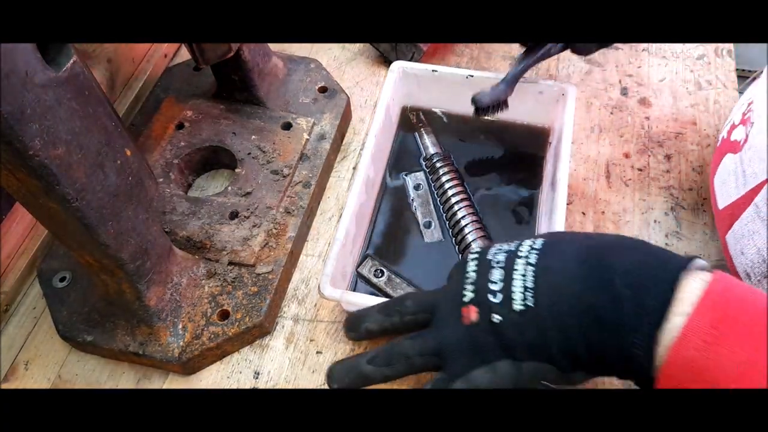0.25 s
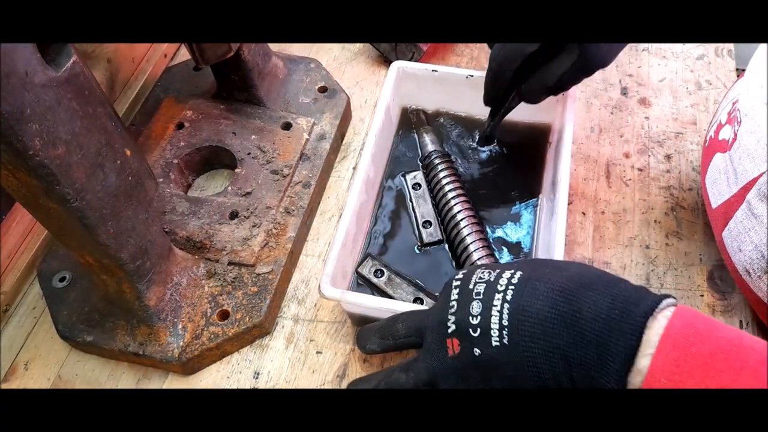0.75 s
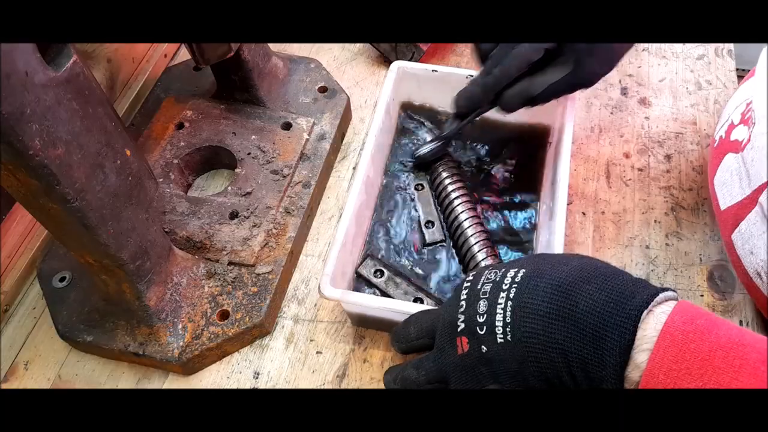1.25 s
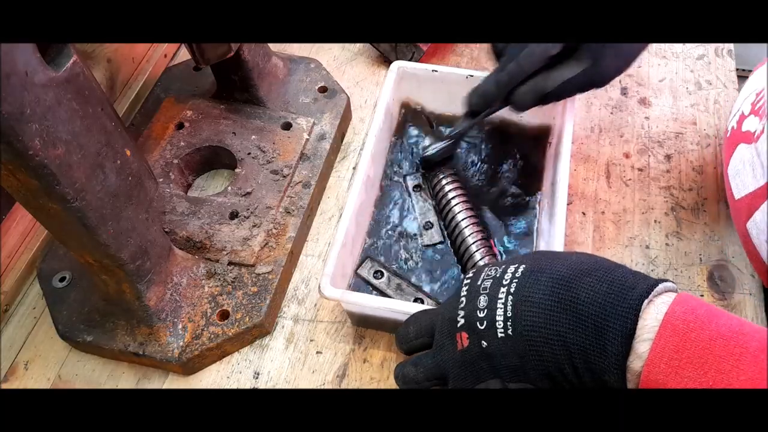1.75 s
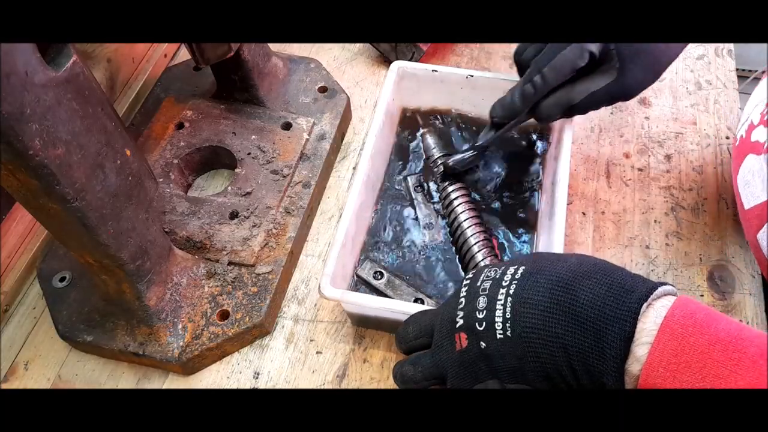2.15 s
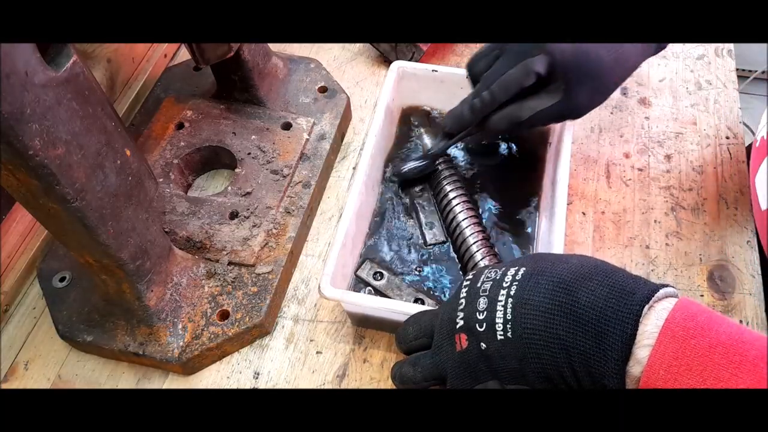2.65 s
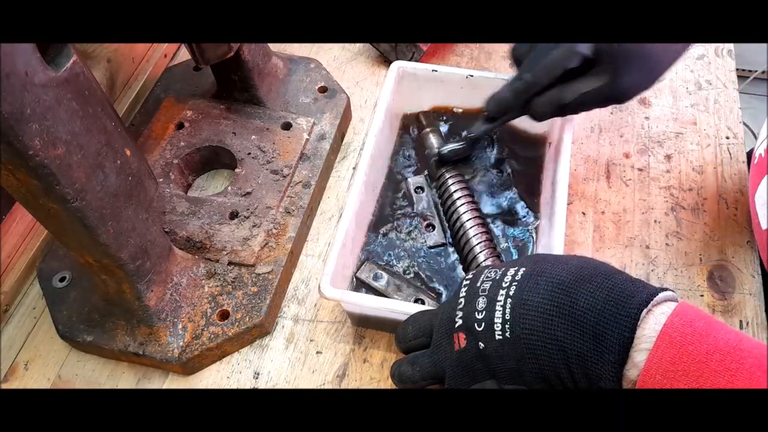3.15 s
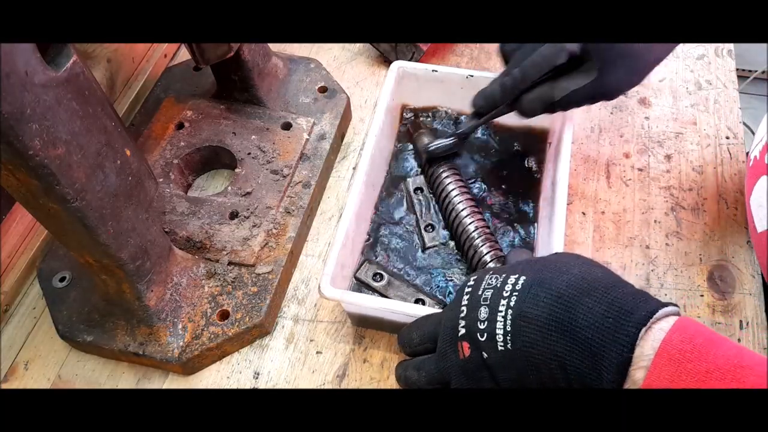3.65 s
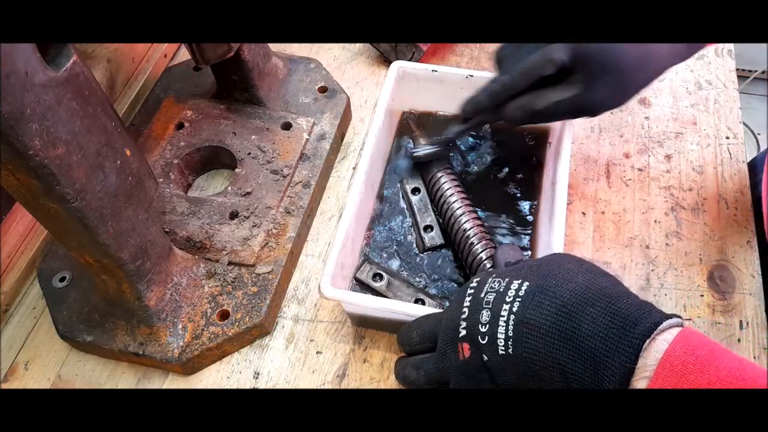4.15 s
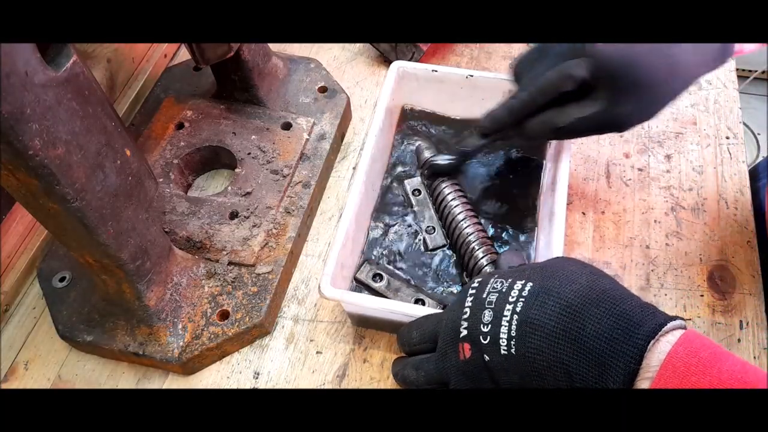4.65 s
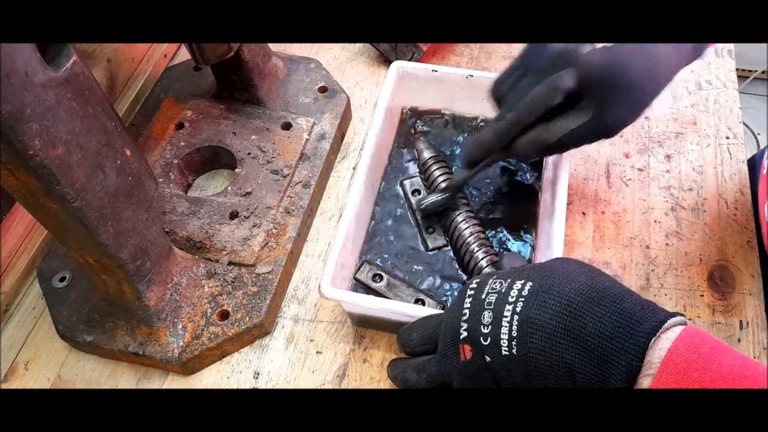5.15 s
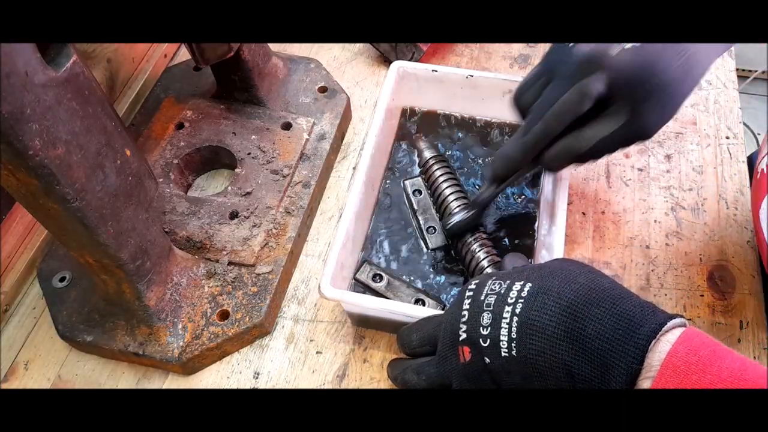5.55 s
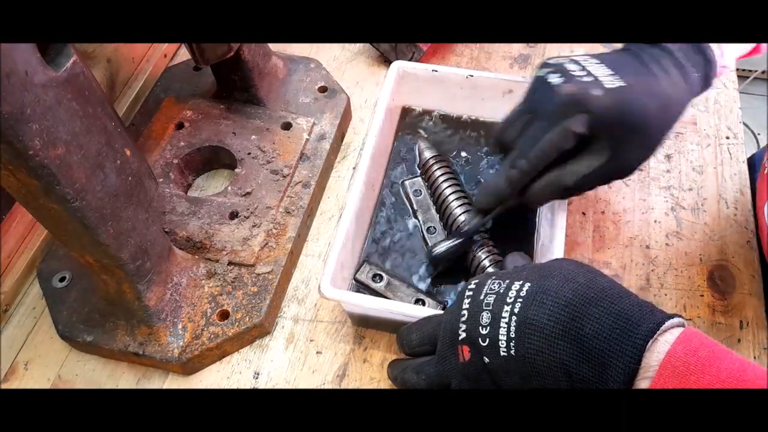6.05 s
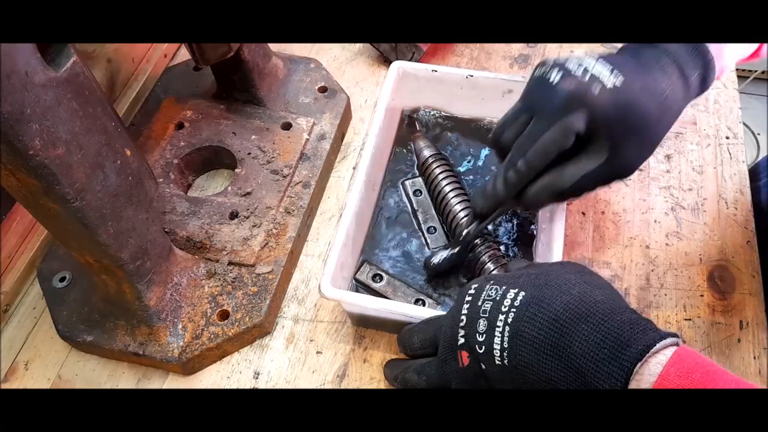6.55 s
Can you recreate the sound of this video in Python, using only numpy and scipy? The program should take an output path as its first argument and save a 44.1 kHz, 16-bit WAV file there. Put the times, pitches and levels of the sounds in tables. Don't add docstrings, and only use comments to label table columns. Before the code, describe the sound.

After faint glove rustles and tub scrapes, bristles rasp rapidly over steel threads, with ringing clacks, hollow tub knocks and soft bench thumps.

```python
import sys
import numpy as np
from scipy import signal
from scipy.fft import rfft, irfft, next_fast_len
from scipy.io import wavfile
from scipy.ndimage import uniform_filter1d

SR = 44100
rng = np.random.default_rng(int(sys.argv[2]) if len(sys.argv) > 2 else 0)


def boost_factor(decibels):
    exponent = np.asarray(decibels, float) / 20
    return 10 ** exponent


def wav_record(signal):
    frames = np.transpose(np.atleast_2d(signal))
    bounded = np.clip(frames, -1, 1)
    quanta = np.round(bounded * 32767).astype(np.int16)
    wavfile.write(sys.argv[1], SR, quanta)


N = 299439


def evened(x):
    return x / np.sqrt(np.mean(x ** 2) + 1e-20)


def read(points, hz):
    f, value = np.transpose(points)
    return np.interp(np.log(hz + 1), np.log(f + 1), value)


def curve(rows, index):
    rows = np.array(rows)
    return np.interp(np.arange(N) / SR, rows[:, 0], rows[:, index])


def add(mix, s, sound):
    part = mix[..., max(round(s * SR), 0):][..., :sound.shape[-1]]
    part += sound[..., :part.shape[-1]]


def coloured(x, points):
    n = x.shape[-1]
    size = next_fast_len(n)
    gain = boost_factor(read(points, np.fft.rfftfreq(size, 1 / SR)))
    return evened(irfft(rfft(x, size) * gain, size)[..., :n])


# f/Hz, likeness [0-1]
PORT_LIKENESS = [(60, 1), (150, 0.84), (300, 0.94), (500, 0.75), (800, 0.13), (1500, 0.48), (3770, 0.31),
                 (15000, 0.075)]


def spread(gate):
    size = next_fast_len(N)
    left, other = rfft(gate * rng.standard_normal((2, N)), size)
    same = np.clip(read(PORT_LIKENESS, np.fft.rfftfreq(size, 1 / SR)), -1, 1)
    right = same * left + np.sqrt(1 - same ** 2) * other
    return irfft(np.array([left, right]), size)[:, :N]


def clumps(per_s, spread_db, length):
    starts = rng.random(N) < per_s / SR
    size = boost_factor(spread_db * np.minimum(rng.exponential(1, N), 4)) * starts
    decay = np.exp(-np.arange(400) / (length * SR))
    return evened(signal.oaconvolve(size, decay)[:N])


def patchy(x, depth_db):
    z = signal.stft(x, nperseg=256)[2]
    field = uniform_filter1d(rng.standard_normal(z.shape[1:]), size=20, axis=0)
    field = uniform_filter1d(field, size=5, axis=1)
    return evened(signal.istft(z * boost_factor(depth_db * evened(field)), nperseg=256)[1][:, :N])


# turn t/s, fastest level/dB, place of top speed [0-1], creep level at the turn/dB
TIP_STROKES = [(1.201, -40.5, 0.73, -85), (1.32, -38, 0.59, -51), (1.428, -38.5, 0.5, -101),
               (1.526, -42.5, 0.54, -52.5), (1.619, -43, 0.56, -57.5), (1.721, -40.5, 0.64, -47.5),
               (1.818, -42, 0.42, -66), (1.898, -55, 1, -50), (1.953, -51, 0.61, -45),
               (2.021, -52, 0.6, -53.5), (2.089, -42.5, 0.27, -48.5), (2.141, -45, 0.52, -57),
               (2.25, -49, 0.51, -67), (2.367, -47.5, 0.43, -53.5), (2.456, -45.5, 0.51, -65),
               (2.566, -48.5, 0.59, -58.5), (2.663, -35.5, 0.55, -66), (2.758, -40, 0.43, -81),
               (2.855, -33.5, 0.37, -66), (2.963, -32.5, 0.6, -57), (3.072, -30, 0.46, -74),
               (3.181, -33, 0.33, -48), (3.36, -87, 0.55, -60.5)]
# turn t/s, fastest level/dB, place
# of top speed [0-1], creep level at the turn/dB
LATER_STROKES = [(3.498, -53, 0.4, -78.5), (3.656, -54.5, 0.56, -89), (3.734, -42, 0.47, -56),
                 (3.806, -37.5, 0.48, -89), (3.906, -34, 0.52, -47.5), (4.005, -37, 0.61, -59),
                 (4.107, -39, 0.4, -76), (4.204, -39, 0.5, -50.5), (4.305, -38, 0.49, -65),
                 (4.405, -40, 0.54, -56), (4.519, -34.5, 0.53, -63), (4.607, -34.5, 0.63, -52),
                 (4.708, -35.5, 0.58, -73), (4.807, -44.5, 0.43, -70), (4.911, -46.5, 0.46, -51),
                 (5.006, -48, 0.65, -57), (5.101, -55, 0.57, -54.5), (5.211, -45, 0.62, -56),
                  (5.32, -49, 0.63, -74), (5.421, -49, 0.48, -66), (5.529, -54.5, 0.65, -52),
                  (5.639, -47, 0.46, -66.5), (5.746, -45.5, 0.34, -71), (5.837, -47.5, 0.42, -62),
                  (5.961, -48, 0.52, -75), (6.05, -47, 0.7, -57.5), (6.143, -51.5, 0.6, -59),
                  (6.295, -50.5, 0.76, -65), (6.395, -46.5, 0.48, -61), (6.488, -75, 0.5, -74),
                  (6.57, -48, 0.7, -49.5), (6.705, -40, 0.36, -66.5), (6.753, -46, 0, -53)]
# lift t/s, touch-down t/s
LIFTS = [
    (6.262, 6.316),
    (6.356, 6.4),
    (6.452, 6.59),
]


def stroke_speed():
    arch_power = 2.11
    shoulder, catch = 0.19, 0.4
    lift_s, lift_db = 0.02, -25
    turn, top_db, place, creep_db = np.transpose(TIP_STROKES + LATER_STROKES)
    t = np.arange(N) / SR
    k = np.maximum(np.searchsorted(turn, t) - 1, 0)
    length = (np.append(turn[1:], N / SR + 0.047) - turn)[k]
    share = np.clip((t - turn[k]) / length, 0, 1)
    skew = np.log(0.5) / np.log(np.clip(place, 0.15, 0.85))
    arch = np.sin(np.pi * share ** skew[k]).clip(0)
    arch = (1 - shoulder) * arch ** arch_power + shoulder * np.tanh((arch / catch) ** 2)
    creep = boost_factor(np.interp(t, turn, creep_db, left=-120))
    lifted = sum(np.clip((t - up) / lift_s, 0, 1) * (t < down) for up, down in LIFTS)
    return 20 * np.log10(boost_factor(top_db[k]) * arch + creep) + lift_db * lifted


# f/Hz, level/dB, t60/s
TUB = [(262, 3, 0.14), (650, 8, 0.034), (330, -4.5, .025), (404, -4, 0.04), (480, 2, 0.11),
       (545, -2, 0.046), (760, -13.5, 0.047), (1065, -12, 0.1), (1590, 7.5, 0.034)]


def through_tub(x, damping, count):
    t = np.arange(5000) / SR
    walls = sum(boost_factor(db - 60 * damping * t / t60) * np.sin(2 * np.pi * hz * t) for hz, db, t60 in TUB[:count])
    return evened(signal.oaconvolve(x, walls[None], axes=1)[:, :N])


# f/Hz, level/dB per Hz
BRISTLE = [(1760, -64), (3000, -30), (4750, -5.5), (6360, -6.5), (8220, 2), (10600, 3), (15200, 1),
           (15800, 2.5)]
# f/Hz, level/dB per Hz
SWISH = [(600, -8), (1000, -9), (1400, -7), (1650, -1), (2300, -0.5), (4700, -1), (6300, -3.5), (9000, -13)]
# t/s, swish against fizz level/dB, tub rumble level/dB
SCRUB = [(1.19, 9, -57), (1.3, -8, -53), (1.7, -3.5, -48), (2.6, -2, -49), (2.95, -8.5, -46),
         (3.3, -13, -46.5), (3.45, 1, -59), (3.6, -5, -56), (4, -8.5, -51.5), (4.42, -6, -53),
         (4.6, -10.5, -57.5), (5.2, -3, -51), (5.35, -2, -59.5), (6.3, -3.5, -65), (6.4, -5.5, -63.5),
         (6.5, -9.5, -78.5), (6.62, -2, -59.5), (6.79, -4, -54.5)]
# t/s, top fizz level/dB
TIPS = [(1.2, -3), (1.8, 6), (2.2, 2), (2.7, 3.5), (3.1, -5), (3.5, -2), (3.9, 3.5), (4.5, -4), (4.9, -1),
        (5.4, 1.5), (5.9, 0), (6.25, 3), (6.36, -7), (6.45, -7), (6.6, 5.5), (6.79, 6.5)]


def brush():
    speed_db = stroke_speed()
    mean_db = uniform_filter1d(np.maximum(speed_db, -90), size=4400)
    scrubbing = np.arange(N) > TIP_STROKES[0][0] * SR

    grain = spread(0.81 + 0.65 * clumps(per_s=510, spread_db=-16.0, length=0.0044))
    fizz = boost_factor(speed_db + 2.5) * patchy(coloured(grain, BRISTLE), depth_db=3.0)
    flank = uniform_filter1d(fizz, size=3)
    fizz = flank + boost_factor(curve(TIPS, index=1)) * (fizz - flank)

    swish_db = 0.61 * speed_db + 0.28 * mean_db - 2.5 + curve(SCRUB, index=1)
    swish = boost_factor(swish_db) * patchy(coloured(grain, SWISH), depth_db=2.0)

    shake = spread(0.9 + clumps(per_s=200, spread_db=1.0, length=0.006))
    eased_db = 0.26 * np.maximum(speed_db - mean_db, -25)
    rumble_gain = boost_factor(curve(SCRUB, index=2) + eased_db - 3.0)
    rumble = rumble_gain * through_tub(shake, damping=2.8, count=7)
    return fizz + scrubbing * (swish + rumble)


# t/s, peak level/dB
SNAPS = [(0.7444, -52), (0.9, -60), (1.2, -59), (2.976, -36), (3.103, -25), (3.19, -38), (3.241, -17.5),
         (3.506, -50), (3.823, -36), (3.923, -27), (4.5272, -34), (4.685, -23), (4.724, -33), (5.7615, -41),
         (6.074, -36), (6.15, -44), (6.317, -62), (6.385, -56), (6.5467, -51), (6.606, -38), (6.707, -29),
         (6.7165, -26), (6.724, -24), (6.7356, -17.5), (6.761, -30)]


def snaps():
    gate, t = np.zeros(N), np.arange(600) / SR
    for s, db in SNAPS:
        add(gate, s, boost_factor(db - 9.0) * t / 0.00058 * np.exp(1 - t / 0.0011))
    return gate * coloured(spread(1), BRISTLE)


def ring(hz, t60, t, apart=1.014):
    phase = np.array([[0], [2]])
    beat = np.sin(2 * np.pi * hz * t) + 0.44 * np.sin(2 * np.pi * apart * hz * t + phase)
    decay = boost_factor(-60 * t / t60) + 0.1 * boost_factor(-20 * t / t60)
    return decay * beat * (1 - np.exp(-(t / 0.0014) ** 2))


# t/s, peak level/dB, steel ring level/dB, brightness [dB per octave]
CLACKS = [(0.186, -42, -43, -5), (0.621, -42, -40, -7), (0.704, -38, -40, -5), (0.841, -44, -30, -9),
          (0.889, -41.5, -27, -6), (1.448, -22.5, -10, -3), (1.6254, -22, -16, -3.5),
          (1.8347, -16.5, 4.5, 0.5), (2.025, -19.5, -7.5, -0.5), (2.2755, -18, -3.5, 0.5),
          (2.397, -26, -32, -1.5), (2.463, -20.5, 2, 1), (2.6804, -17.5, 0, 0), (2.789, -36, -29, -5),
          (2.804, -21.5, -28, 0.5), (2.874, -25, -28, -1.5), (2.898, -26, -30.5, -1),
          (2.9448, -30, -31, -2.5), (3.0901, -14, 5, -1), (3.231, -32.5, -30, -2), (3.312, -33, -31, -6),
          (3.3318, -22, -13, -2.5), (3.597, -29, -32, -1), (3.639, -27.5, -32, -1), (4.408, -36, -16, -3),
          (5.119, -34.5, -30, -2), (5.1908, -24, -19, -11.5), (5.537, -22.5, -34, 1),
          (5.545, -34.5, -34, -17)]
# f/Hz, level/dB per Hz
CRACK = [(500, -9.5), (1200, 9.5), (2000, 5.5), (3400, 7.5), (5000, -1.5), (9000, -5.5), (15000, -12.5)]
# f/Hz, t60/s
STEEL = (7450, 0.026)
# t/s, level/dB, f/Hz, t60/s
PINGS = [(1.837, -26, 3055, 0.042), (1.838, -36, 1150, 0.065), (2.273, -31, 3290, 0.035),
         (2.463, -38, 3030, 0.053), (2.682, -38, 2970, .08), (2.682, -40.5, 1078, 0.14),
         (2.804, -30, 4730, 0.029), (3.093, -30.5, 2900, 0.072), (3.094, -39, 1089, 0.15),
         (3.088, -60, 2460, 0.06), (3.331, -35, 2927, 0.092), (3.332, -39, 7460, 0.085),
         (3.333, -31.5, 667, 0.056), (6.346, -56, 1770, 0.09), (2.806, -38.5, 261, 0.071),
         (3.683, -44, 1560, .05), (5.538, -39.5, 2260, 0.052)]


def clacks():
    out, t = np.zeros((2, N)), np.arange(4096) / SR
    draws = rng.standard_normal((len(CLACKS), 3, len(t)))
    rattle = np.exp(-t / 0.0032) + 0.4 * np.exp(-t / 0.021)
    for (s, db, ring_db, tilt_db), noise in zip(CLACKS, draws):
        colour = [(hz, level + tilt_db * np.log2(hz / 2000)) for hz, level in CRACK]
        crack = coloured(noise[0] + 1.16 * noise[1:], colour) * rattle
        add(out, s, boost_factor(db - 0.5) * (crack / abs(crack).max() + boost_factor(ring_db) * ring(*STEEL, t)))
    for s, db, hz, t60 in PINGS:
        add(out, s, boost_factor(db) * ring(hz, t60, t, apart=1.024))
    return out


# t/s, peak level/dB, upper wall modes level/dB, floor mode f/Hz, near wall mode
# f/Hz
KNOCKS = [(0.184, -52.5, 17, 268, 515), (0.594, -52.5, 5, 273, 546), (0.705, -50, -5, 271, 630),
          (0.851, -40, -15, 248, 500), (1.275, -47.5, -17, 267, 604), (1.379, -53, 3, 272, 610),
          (1.445, -38, 11, 270, 693), (1.626, -32, -6.5, 261, 684), (1.655, -35.5, -10, 271, 534),
          (1.717, -37, -8, 270, 650), (1.838, -31.5, 3, 277, 710), (1.901, -35.5, -13, 280, 637),
          (1.952, -36.5, -9, 259, 625), (2.022, -40, 7, 270, 650), (2.119, -38.5, -10, 279, 644),
          (2.275, -36, 2, 276, 650), (2.347, -39, -13, 251, 620), (2.399, -38, 1, 280, 580),
          (2.465, -33, -5, 276, 650), (2.547, -44, 0, 272, 647), (2.681, -32, -6, 270, 700),
          (2.729, -30.5, -9, 272, 634), (2.806, -29, -15.5, 258, 634), (2.893, -33, 7, 270, 636),
          (2.944, -28, -2, 263, 646), (3.09, -30, 23, 272, 663), (3.166, -34, -4, 287, 624),
          (3.23, -36, -1, 262, 670), (3.331, -42, 17, 266, 670), (3.57, -46, -12, 302, 634),
          (3.592, -39, -12, 282, 603), (3.616, -37.5, -22, 262, 580), (3.718, -42.5, -17, 263, 633),
          (4.149, -46, -17, 252, 610), (4.358, -40, -11, 286, 650), (4.412, -39.5, 26, 270, 613),
          (4.799, -45.5, -17, 276, 555), (5.191, -44.5, 0, 263, 600), (5.566, -42.5, -13, 272, 644),
          (6.33, -58.5, -40, 278, 620),
          (1.228, -65, 3, 270, 500), (1.256, -57, 10, 270, 760), (1.334, -57, 5, 270, 730),
         (1.55, -53, 5, 270, 650), (1.671, -45, 0, 287, 593), (2.048, -41.5, 8, 270, 614),
         (2.177, -47.5, 7, 270, 537), (2.58, -45, -10, 270, 670), (2.697, -38.5, 6, 270, 720),
         (2.789, -45.5, -7, 270, 580), (2.873, -39, 12, 270, 726), (2.96, -34, 31, 270, 694),
         (3.105, -39.5, 10, 270, 690), (3.211, -38.5, -11, 300, 415), (3.602, -35.5, 2, 330, 414),
         (3.685, -49, -11, 273, 530), (5.09, -60, 5, 270, 710), (6.17, -54.5, 6, 300, 615)]


def knocks():
    out, t = np.zeros((2, N)), np.arange(4000) / SR
    hz, mode_db, t60 = np.transpose(TUB[:-1])[..., None]
    rows = KNOCKS
    draws = rng.standard_normal((len(rows), 3, len(t)))
    for (s, db, upper_db, floor_hz, wall_hz), draw in zip(rows, draws):
        size_db = mode_db + (hz > 330) * (upper_db + 2)
        upper_hz = hz[2:, 0] * (1 + 0.02 * draw[0, -6:])
        pitch = np.append([floor_hz, wall_hz], upper_hz)[:, None]
        rattle = (draw[0] + 0.29 * draw[1:]) * t / (t + 0.000099) * np.exp(-t / 0.015)
        blow = rattle + 8.0 * (t == 0)
        modes = boost_factor(-60 * t / t60) * np.sin(2 * np.pi * pitch * t)
        rings = signal.fftconvolve(blow[:, None], modes[None], axes=2)[..., :len(t)]
        rings = rings / np.sqrt((rings ** 2).mean((0, 2), keepdims=True))
        add(out, s, boost_factor(db - 8.0) * evened((boost_factor(size_db) * rings).sum(1)))
    return out


# start t/s, end t/s, rustle level/dB, scrape level/dB
MOVES = [
    (-.03, 0.077, -72, -76),
    (0.052, 0.136, -66.5, -73),
    (0.143, 0.38, -70, -62),
    (0.371, 0.445, -63.5, -58),
    (0.53, 0.599, -70.5, -67),
    (0.584, 0.709, -62, -55),
    (0.703, 0.845, -60.5, -61),
    (0.831, 0.941, -67, -51),
    (0.929, 1.055, -73, -61.5),
    (1.06, 1.12, -74, -88),
]


def moves(index):
    t, grip_s = np.arange(N) / SR, 0.03
    return sum(boost_factor(row[index]) * np.clip(np.minimum(t - row[0], row[1] - t) / grip_s + 0.5, 0, 1) ** 2
               for row in MOVES)


# f/Hz, level/dB per Hz
RUSTLE = [(590, -5.5), (1000, -9), (1400, -8.5), (1570, -7.5), (2090, -12.5), (3480, -13), (5990, -15),
          (9080, -14), (15800, -23)]
# t/s, f/Hz
SQUEAK = [(0, 13000), (.035, 14700), (.075, 14600), (.105, 13200), (.14, 13250), (.175, 14850), (.2, 14800),
          (.225, 13500), (.34, 12700)]


def handling():
    cloth = spread(12.0 + 0.15 * clumps(per_s=77, spread_db=-20.0, length=0.0014))
    rustle = boost_factor(4.5) * moves(index=2) * patchy(coloured(cloth, RUSTLE), depth_db=3.0)

    rub = spread(2.5 + clumps(per_s=200, spread_db=0.3, length=0.003))
    scrape = boost_factor(-3) * moves(index=3) * through_tub(rub, damping=1.6, count=9)

    wobble = 1 + 0.04 * uniform_filter1d(rng.standard_normal(N), size=150)
    slips = np.clip(0.8 + 0.45 * evened(uniform_filter1d(rng.standard_normal(N), size=500)), 0, 2)
    turns = 2 * np.pi * np.cumsum(curve(SQUEAK, index=1) * wobble) / SR
    tone = np.sin(turns) + 0.45 * np.sin(turns / 2)
    squeak = boost_factor(-77) * tone * slips * (np.arange(N) < SQUEAK[-1][0] * SR)
    return rustle + scrape + squeak


# peak t/s, level/dB, length/s, board mode f/Hz
GRIP_PUSHES = [
    (0.34, -66, 0.05, 152),
    (0.425, -58.5, 0.042, 154),
    (0.633, -51, 0.028, 154),
    (0.749, -54, 0.035, 163),
    (0.9, -48, 0.039, 155),
    (1.026, -49.5, 0.025, 152),
]
# peak t/s, level/dB, length/s, board mode
# f/Hz
SCRUB_PUSHES = [(1.237, -47.5, 0.028, 148), (1.294, -50.5, 0.061, 151), (1.388, -55, 0.045, 151),
                (1.486, -45, 0.024, 149), (1.539, -45, 0.093, 155), (1.664, -33, 0.013, 150),
                (1.757, -36.5, 0.035, 149), (1.923, -34.5, 0.061, 153), (1.995, -38, 0.028, 149),
                (2.068, -46.5, 0.031, 141), (2.11, -48, 0.016, 148), (2.155, -39, 0.065, 150),
                (2.314, -38.5, 0.04, 152), (2.424, -42, 0.042, 150), (2.508, -40.5, 0.039, 155),
                (2.614, -37, 0.026, 143), (2.763, -37, 0.046, 148), (2.82, -36.5, 0.02, 151),
                (2.85, -34, 0.038, 151.6), (2.9, -65, 0.036, 164), (2.977, -27.5, 0.034, 148.5),
                (3.08, -39, 0.014, 159), (3.123, -33, 0.0075, 148), (3.201, -32.5, 0.035, 147.5),
                (3.265, -40.5, 0.014, 144), (3.365, -37.5, 0.045, 147), (3.415, -46, 0.0073, 146),
                (3.554, -47, 0.032, 154), (3.607, -38, 0.012, 152), (3.637, -29, 0.02, 154),
                (3.766, -49, 0.18, 146.7), (3.864, -53, 0.034, 151), (3.954, -51, 0.047, 138),
                (4.011, -46.5, 0.03, 155), (4.086, -44.5, 0.021, 147), (4.167, -42.5, 0.05, 147.4),
                (4.289, -43, 0.075, 156.5), (4.404, -41.5, 0.04, 147), (4.494, -44, 0.027, 154),
                (4.585, -51, 0.08, 148.5), (4.636, -49, 0.054, 152), (4.702, -50, 0.022, 143),
                (4.841, -43.5, 0.038, 156), (4.927, -43.5, 0.041, 155), (5.134, -47, 0.026, 148),
                (5.201, -49, 0.095, 150.4), (5.362, -52, 0.043, 156.4), (5.498, -57, 0.069, 145),
                (5.572, -43, 0.031, 148), (5.6, -39.5, 0.042, 150.4), (5.706, -56, 0.021, 150),
                (5.793, -47, 0.034, 151), (5.898, -50.5, 0.03, 141), (6.009, -50, 0.021, 146),
                (6.083, -55, 0.034, 146), (6.21, -50.5, 0.047, 153), (6.364, -48.5, 0.031, 154)]
# f/Hz, level/dB per Hz
SHUDDER = [(30, -10), (70, 1), (108, 9.5), (130, 12.5), (170, 16), (205, -6.5), (300, 1.5), (600, -42.5)]


def bench():
    swell, fade = 0.79, 0.98
    out, t = np.zeros((2, N)), np.arange(-.1, .15, 1 / SR)
    pushes = np.zeros(N)
    rows = GRIP_PUSHES + SCRUB_PUSHES
    for (s, db, length, hz), draw in zip(rows, rng.standard_normal((len(rows), 3))):
        reach = max(length, 0.004) * np.where(t < 0, swell, fade)
        shape = boost_factor(db - 9.6 * np.abs(t / reach) ** 1.4)
        turns = hz * t + 40 * draw[1] * t ** 2
        add(out, s - 0.1, np.sqrt(2) * shape * np.sin(2 * np.pi * turns + 3 * draw[2]))
        add(pushes, s - 0.1, shape)
    chatter = evened(uniform_filter1d(rng.standard_normal(N), size=700))
    shudder = uniform_filter1d(pushes, size=1500) * coloured(spread(1), SHUDDER)
    return out * (1 + 0.13 * chatter) + boost_factor(-4.5) * shudder


def workshop(x):
    t = np.arange(9000) / SR
    signs = rng.choice([-1., 1.], (2, len(t)))
    sparse = rng.random((2, len(t))) < 0.05
    taps = signs * sparse * boost_factor(-60 * t / 0.09) * (t > 0.003)
    return signal.oaconvolve(x, taps / np.linalg.norm(taps[0]), axes=1)[:, :N]


# f/Hz, level/dB per Hz
FLOOR = [(18, -33), (30, 10), (141, 6.5), (645, -16), (1270, -12.5), (2040, -20.5), (5000, -21),
         (15800, -22)]


def quiet_floor():
    return boost_factor(-69) * coloured(spread(1), FLOOR)


def scene():
    near = brush() + snaps() + clacks() + knocks() + handling()
    return near + boost_factor(-10.0) * workshop(near) + bench() + quiet_floor()


def roll_off(x):
    return signal.sosfilt(signal.butter(12, 16840, fs=SR, output="sos"), x)


# f/Hz, left minus right level/dB
LEAN = [(60, -6.5), (140, 2.5), (300, -1), (450, -5), (600, -0.5), (900, 3), (2000, -0.5), (12000, 0.5)]
# f/Hz, phase by which the left port leads [rad]
LEAD = [(60, 0.44), (300, 0.38), (560, 0.07), (800, 1.66), (1200, 0.4), (15000, 0.55)]


def record(dry):
    bass_hz, edge_hz = 81, 16010
    size = next_fast_len(N + SR)
    hz, side = np.fft.rfftfreq(size, 1 / SR), np.array([[.5], [-.5]])
    edge = np.sin(np.pi / 2 * np.clip((edge_hz - hz) / 110, 0, 1)) ** 2
    ports = boost_factor(read(LEAN, hz) * side) * np.exp(1j * read(LEAD, hz) * side)
    response = ports * edge / (1 + (bass_hz / (hz + 1)) ** 3)
    mix = irfft(rfft(dry, size) * response, size)[:, :N]
    return roll_off(mix)


dry = scene()
out = record(dry)
wav_record(out)
```